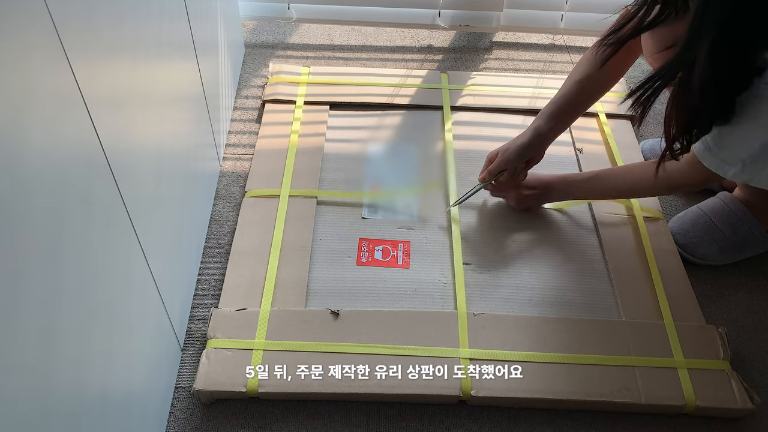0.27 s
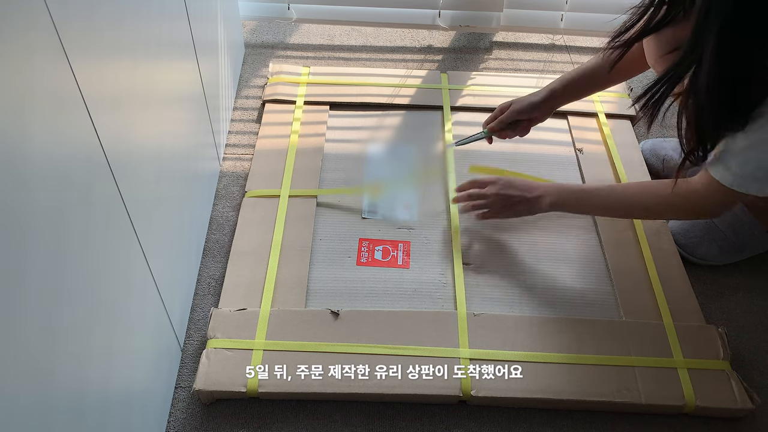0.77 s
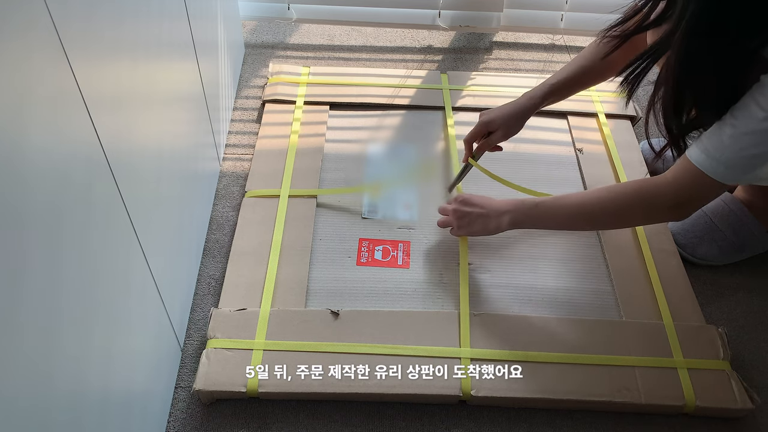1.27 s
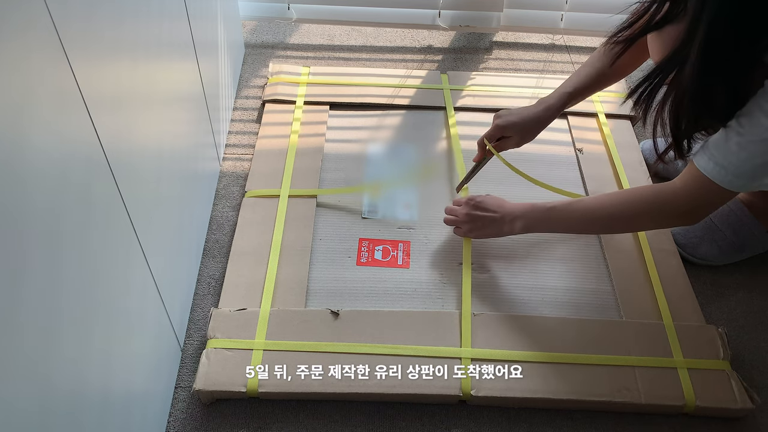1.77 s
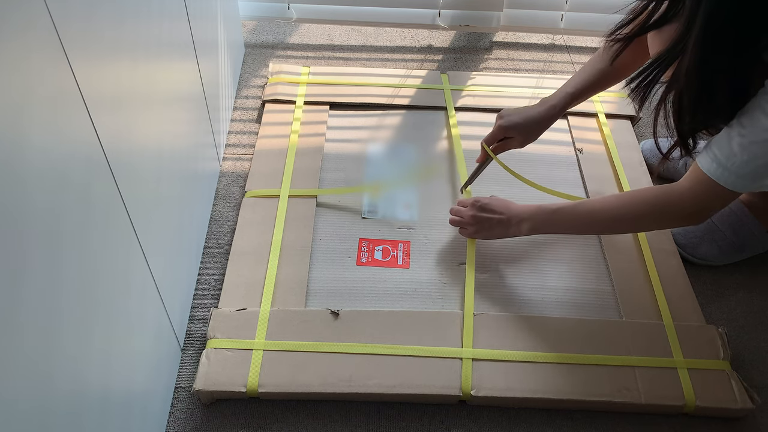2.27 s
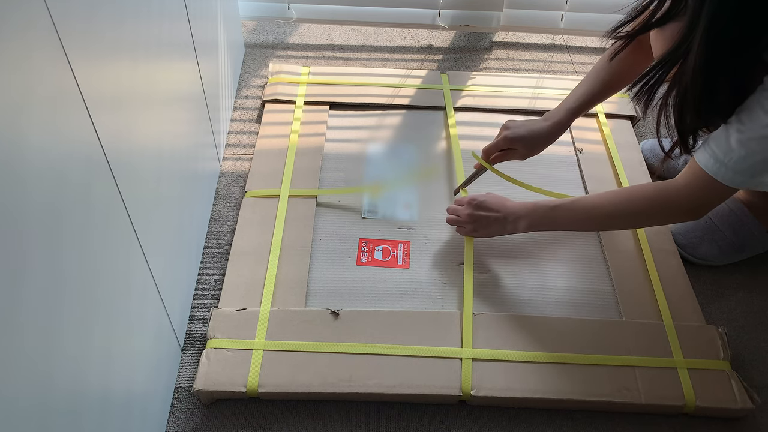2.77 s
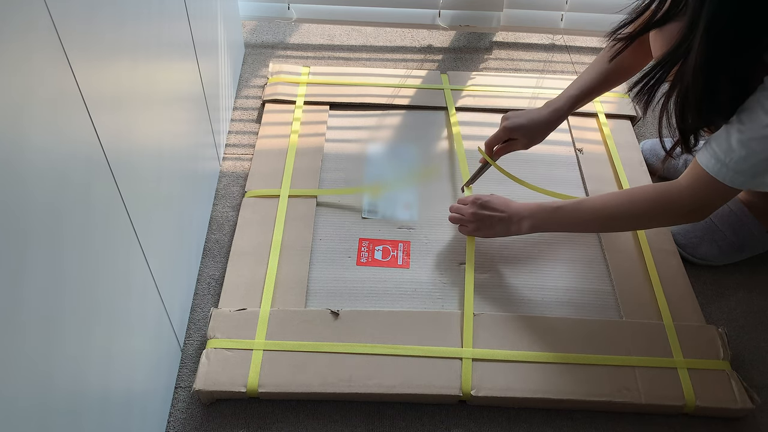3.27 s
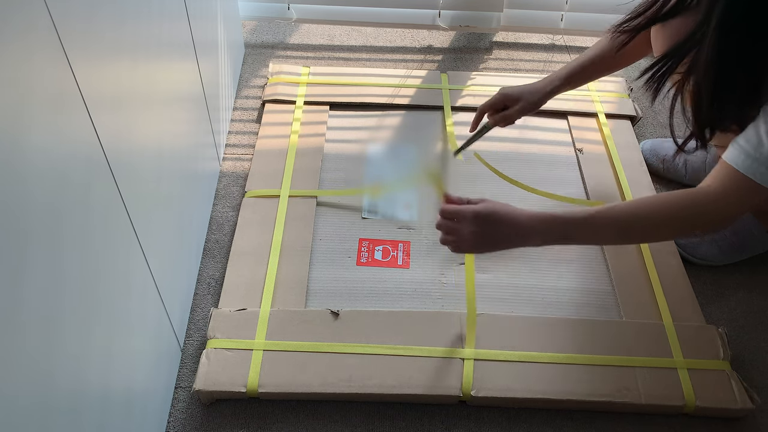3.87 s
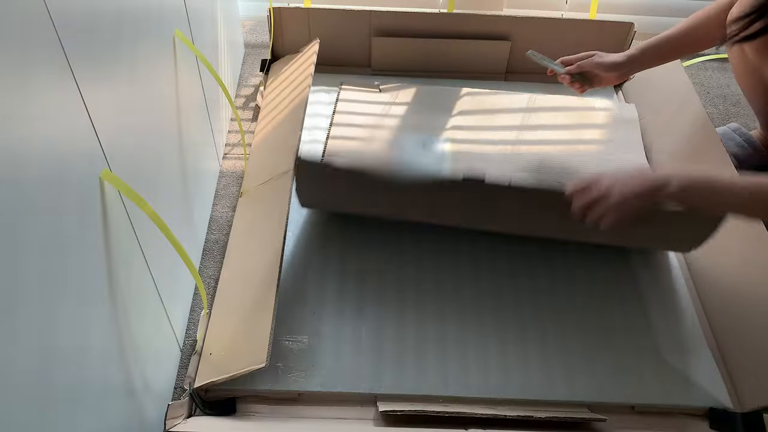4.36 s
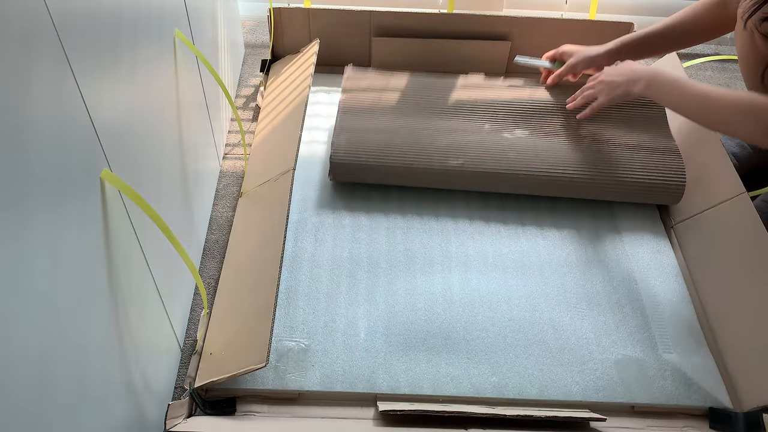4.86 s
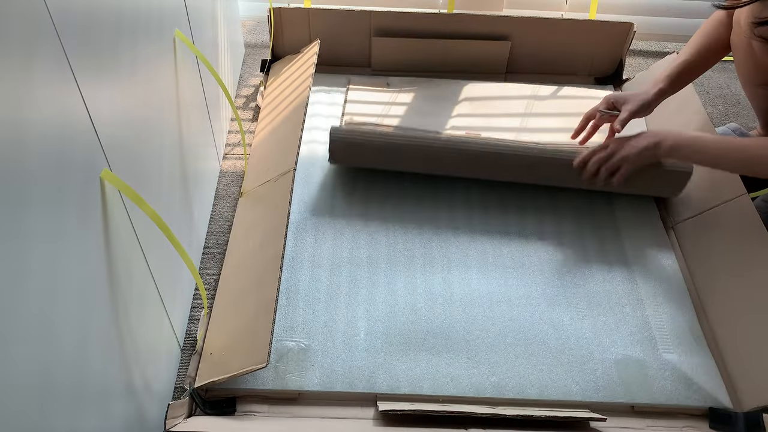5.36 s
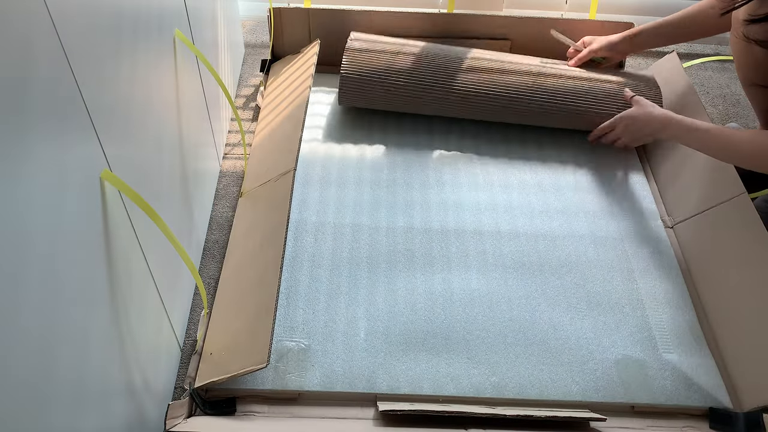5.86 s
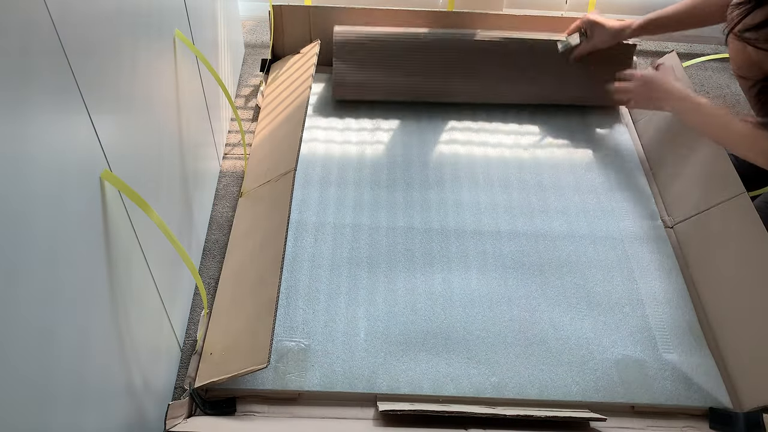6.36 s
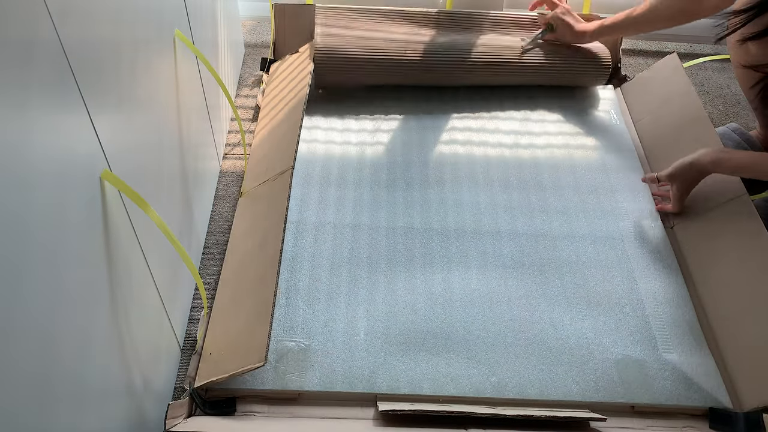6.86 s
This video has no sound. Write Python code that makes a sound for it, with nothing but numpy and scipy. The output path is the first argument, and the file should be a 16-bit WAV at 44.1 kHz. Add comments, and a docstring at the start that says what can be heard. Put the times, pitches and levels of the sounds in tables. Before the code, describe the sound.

In a small bare room, plastic strapping is cut with dry ticks and sharp snaps, followed by cardboard rolling, rustling, hissing and knocking.

```python
"""Dry ticks, slips and loud snaps: a knife saws at taut plastic straps round a flat cardboard parcel on the floor.
Then a corrugated sheet is lifted, rolled up and dragged over foam, with crackle, hiss and knocks.
Ticks and knocks are noise bursts through resonances; rubbing and dragging are clumps of random clicks, filtered.
A small bare room adds one echo and a strong diffuse tail, over a very quiet floor; both channels are alike."""
import sys
import numpy as np
from scipy import signal
from scipy.fft import rfft, irfft
from scipy.io import wavfile

SR = 44100
rng = np.random.default_rng(int(sys.argv[2]) if len(sys.argv) > 2 else 0)


def output_pcm(signal):
    """Save a mono or channel-first signal as 16-bit PCM at the path in sys.argv[1].

    Samples are clipped to [-1, 1] before scaling.
    """
    pcm = np.clip(np.atleast_2d(signal).T, -1, 1) * 32767
    wavfile.write(sys.argv[1], SR, np.round(pcm).astype(np.int16))


N = 313992

# Ticks and snaps of knife and strap. Each row: start in seconds, crack peak in dB, blade ring in Hz,
# strap ring in dB and in Hz, board thud in dB, how loosely the ends chatter on in dB,
# top of the crack and blade ring, both in dB against the crack.
TICKS = [(0.0499, -48.5, 5050, -63, 1940, -54, -10, -11, -2),
         (0.0729, -39, 4070, -46, 1710, -42.5, -21, -27, -3.5),
         (0.1508, -52, 5770, -62, 1960, -57.5, -6, -28, -8),
         (0.2032, -13, 5470, -15.5, 1370, -19, -19, -48, -9),
         (0.4375, -52, 5190, -56, 1250, -61, -16.5, -24, -5),
         (0.544, -48.5, 3200, -51, 1310, -65, -10, -17, -11),
         (0.5606, -43, 3040, -38.5, 1960, -62, -11, -9, -8),
         (0.5704, -38, 3060, -32, 1660, -60, -17, -4, -4),
         (0.585, -35, 2880, -50, 1580, -66, -8.5, -10, -3),
         (0.5946, -39, 5000, -25.5, 1630, -64, -16, -5, -11),
         (0.6136, -29, 3130, -33, 1680, -52, -17.5, -8, -15),
         (0.625, -31, 4800, -14, 1410, -29.5, -27.5, -18, -8),
         (0.6408, -36, 5070, -32, 1230, -34, -15, -20, -5),
         (0.7004, -39.5, 3870, -48, 1280, -56, -17.5, -20, -11),
         (0.876, -37, 3860, -27, 1680, -39.5, -15.5, -7.5, -2),
         (0.8904, -32.5, 3700, -26, 1840, -45.5, -10.5, -24, -13),
         (1.1881, -71.5, 3350, -64.5, 1600, -55.5, -18.5, -18, -11),
         (1.255, -40, 4330, -46, 1640, -46.5, -20, -18, 0.5),
         (1.3902, -62, 3440, -80, 1100, -55, -26.5, -18, -7),
         (1.4643, -43, 5500, -71, 2150, -54, -18.5, -30, -6.5),
         (1.6091, -41, 3030, -57, 1090, -37.5, -28.5, -1, -13),
         (1.6214, -34.5, 4500, -36.5, 1130, -38, -22.5, -22, -10.5),
         (1.6588, -39.5, 3350, -56, 1240, -49, -19, -24, 0),
         (1.6886, -60, 3360, -70, 1240, -38, -18, -5, -8),
         (1.7279, -38, 5400, -62, 1140, -53, -24, -25, 1.5),
         (1.7973, -47.5, 5400, -51.5, 1260, -50, -15, -14, -14),
         (1.8506, -54, 5300, -64, 1070, -42, -20, -18, -6),
         (1.9327, -51, 5260, -48, 1230, -41.5, -21, -19, -8),
         (1.9488, -35.5, 3500, -61, 1220, -61, -26, -26, -12),
         (2.0409, -45.5, 5510, -58, 1070, -44.5, -16, -29, -10),
         (2.0782, -44, 3560, -69, 1330, -35, -30, -27, -1.5),
         (2.168, -33, 4930, -55, 1090, -30.5, -27, -6, -7),
         (2.198, -30, 5740, -36, 2180, -35, -11, -23, -7),
         (2.212, -18, 5790, -28, 1580, -27.5, -26, -33, -20),
         (2.2654, -23.5, 5500, -30.5, 1940, -36.5, -15, -34, -1.5),
         (2.2844, -29.5, 5360, -30, 1250, -48, -19, -4.5, -14),
         (2.3047, -21.5, 3470, -28, 1740, -26.5, -22.5, -26, -11),
         (2.371, -35.5, 3100, -43, 1320, -68, -38, -16, -8),
         (2.3999, -44, 5250, -64, 1180, -70, -23, -17, -3),
         (2.5092, -55, 3640, -69, 1120, -48.5, -18.5, 3.5, -8),
         (2.5271, -40.5, 5070, -56, 1630, -45.5, -28, -46, -13),
         (2.614, -33.5, 5100, -49, 1110, -30.5, -30, -12, -6.5),
         (2.72, -63, 5270, -76, 1310, -45.5, -18, -17, -2),
         (2.7626, -24.5, 5500, -35.5, 1220, -33, -21, -19, -20),
         (2.8675, -42, 5240, -70, 1750, -80, -29, -17, -11),
         (2.9534, -46, 3630, -63, 1700, -49.5, -20, -31, -8),
         (2.9688, -28.5, 3370, -33.5, 1400, -45.5, -21, -24, -1),
         (2.9981, -39.5, 3320, -55, 1420, -40.5, -16.5, -11, -6),
         (3.095, -41.5, 5300, -64, 1590, -56, -31, -16, -13),
         (3.1568, -42, 3720, -68, 2090, -67, -26.5, 0, -0.5),
         (3.1786, -35.5, 4940, -41, 1260, -37, -22.5, -27, -18),
         (3.271, -66, 5360, -69, 1270, -34.5, -25, -20, -8),
         (3.3285, -37, 5320, -41, 1570, -32, -31, -29, -10),
         (3.3884, -38.5, 3640, -59, 2130, -49, -12, -15, -3.5),
         (3.4135, -25.5, 5440, -29, 1120, -34.5, -15.5, -7, -14),
         (3.428, -24, 5630, -41, 1090, -40.5, -25, -19, -22),
         (3.4447, -24.5, 5750, -32.5, 1710, -41, -25, -25, -15),
         (3.5142, -13, 3070, -10, 1426, -14, -26, -42, -8.5),
         (3.6222, -36.5, 4850, -30, 1340, -50, -23.5, -18, -14),
         (3.728, -42, 3040, -69, 1450, -59, -18.5, -15, -5),
         (3.8045, -47.5, 6000, -47, 1920, -59, -16, -25, -11),
         (3.8811, -58.5, 3130, -62, 1375, -74, -28, -11, -1),
         (3.919, -32.5, 4300, -75.5, 2000, -81, -24, -30, -4)]


def amp(db):
    """Gain of a level in dB."""
    return 10 ** (np.asarray(db) / 20)


def rms_one(x):
    """Scaled to rms 1."""
    return x / np.sqrt(np.mean(x ** 2) + 1e-20)


def peak_one(x):
    """Scaled to peak 1."""
    return x / np.max(np.abs(x))


def in_time(rows):
    """The columns of a curve at every sample; -200 dB outside it."""
    s, *columns = np.transpose(rows)
    t = np.arange(N) / SR
    return [np.interp(t, s, column, left=-200, right=-200) for column in columns]


def at_hz(points, hz):
    """A table of (Hz, value) read on a log-frequency axis."""
    table_hz, values = np.array(points).T
    return np.interp(np.log(hz), np.log(table_hz), values)


def coloured(x, spectrum):
    """x shaped by a spectrum in dB."""
    hz = np.maximum(np.fft.rfftfreq(len(x), 1 / SR), 1)
    return irfft(rfft(x) * amp(at_hz(spectrum, hz)), len(x))


def band(x, low_hz, high_hz):
    """Band-pass."""
    return signal.sosfilt(signal.butter(2, [low_hz, high_hz], "band", fs=SR, output="sos"), x)


def resonance(x, hz, width_hz):
    """Two-pole resonance, gain 1 on top."""
    r = np.exp(-np.pi * width_hz / SR)
    feedback = [1, -2 * r * np.cos(2 * np.pi * hz / SR), r * r]
    return signal.lfilter([(1 - r * r) / 2, 0, (r * r - 1) / 2], feedback, x)


def drift(rate_hz):
    """Slow random wander of rms 1: noise through two equal low-pass poles."""
    r = np.exp(-2 * np.pi * rate_hz / SR)
    noise = rng.standard_normal(N + SR)
    return rms_one(signal.lfilter([1], [1, -2 * r, r * r], noise)[SR:])


def grains(per_s, spread_db, clump_db):
    """Random clicks of uneven size that come in clumps."""
    sizes = amp(spread_db * np.minimum(rng.exponential(1, N), 3)) * rng.standard_normal(N)
    present = rng.random(N) < per_s / SR
    clumps = amp(clump_db * np.clip(drift(25), -2, 2))
    return sizes * present * clumps


def after(times, levels_db, rise_s, fade_db_per_s):
    """Gain that swells after each event and fades; powers add."""
    power, t = np.zeros(N + SR), np.arange(SR) / SR
    shape = (np.clip(t / rise_s, 0, 1) * amp(-fade_db_per_s * t)) ** 2
    for s, db in zip(times, levels_db):
        power[round(s * SR):][:SR] += amp(db) ** 2 * shape
    return np.sqrt(power[:N])


def quiet_floor():
    """Faint steady noise under everything, shaped by its spectrum."""
    # Each row: frequency in Hz, spectral density in relative dB per Hz.
    floor_spectrum = [(25, -66.5), (45, 14), (65, 13.5), (110, 11.5), (450, 3), (1300, 3), (2400, -3.5),
                      (5400, -5), (12000, -19.5), (16000, -28)]
    return amp(-75) * rms_one(coloured(rng.standard_normal(N), floor_spectrum))


def room(x):
    """Direct sound, one near-wall echo and a diffuse tail, drawn anew every 4096 samples, dying band by band."""
    # Each row: frequency in Hz, time to die by 60 dB in seconds.
    decay_times = [(80, 0.44), (250, 0.27), (600, 0.36), (1500, 0.19), (4000, 0.21), (10000, 0.31)]
    wall_echo_s, wall_echo_db, tail_db = 0.012, -14, -7
    step = 4096      # samples between one tail and the next
    t, out = np.arange(SR // 2) / SR, x.copy()
    edges = 40 * 2 ** np.arange(0, 9.1, 1)      # octave bands, Hz
    white = rng.standard_normal((2, N // step + 2, len(t)))      # neighbouring bands get unrelated noise
    tails = 0
    for k, (low, high) in enumerate(zip(edges, edges[1:])):
        t60 = at_hz(decay_times, np.sqrt(low * high))
        tails = tails + band(white[k % 2], low, high) * amp(-60 * t / t60)
    tails = tails * np.clip(t / .014, 0, 1) ** 1.2      # reflections thicken over the first milliseconds
    tails = amp(tail_db) * tails / np.sqrt(np.mean(np.sum(tails ** 2, axis=1)))
    tails[:, round(wall_echo_s * SR)] += amp(wall_echo_db)
    for k, tail in enumerate(tails[:-1]):
        start = k * step
        wet = signal.fftconvolve(x[start:start + step], tail)[:N - start]
        out[start:start + len(wet)] += wet
    return out


def board(x):
    """The broad modes of the cardboard panel, in parallel."""
    # Each row: mode in Hz, width in Hz, level in dB.
    modes = [(175, 42, -5), (270, 69, -6.5), (335, 91, 18), (446, 610, 32), (670, 280, 20.5),
             (990, 790, -2.5)]
    return sum(amp(db) * resonance(x, hz, width_hz) for hz, width_hz, db in modes)


def drag():
    """Flutes crackle as the sheet bends; its face slides on the foam with a finer hiss."""
    # Sheet lifted, then rolled and dragged, one group of rows a stroke. Each row: time in seconds,
    # flute crackle in dB, foam hiss and board in dB against the crackle.
    strokes = [
        [(4.03, -76, 2, -6), (4.092, -52, -12.5, 1), (4.31, -52, -6, -8.5), (4.394, -57, 1, -11),
         (4.49, -51.5, 2.5, -4)],
        [(4.503, -27.5, -11.5, -4), (4.533, -44, -17.5, 5.5), (4.615, -58.5, -18, 2), (4.66, -64, -4, -5)],
        [(4.67, -50, -13, -5), (4.818, -45, -9.5, -6.5), (4.948, -76, -8, 1), (4.98, -45.5, -3, -4.5),
         (5.07, -66.5, -7, 5)],
        [(5.08, -59.5, 3, -1), (5.124, -39, -5, -4.5), (5.23, -47.5, -10, -3.5), (5.324, -52, -1, -10),
         (5.35, -47.5, -1, -10)],
        [(5.36, -47, -4.5, -7), (5.418, -38.5, -5, -2.5), (5.544, -38, -4, -7), (5.624, -44.5, -7, -3),
         (5.83, -48.5, -4, -6)],
        [(5.84, -47.5, -16, -2), (5.886, -51.5, 2.5, -4), (5.904, -43, -12, 2.5), (5.988, -36, -6.5, 2),
         (6.11, -53.5, -7.5, -12)],
        [(6.12, -54, -16, 0), (6.124, -51, -6.5, 2), (6.176, -43.5, 0, 2.5), (6.196, -34.5, -4.5, -1.5),
         (6.255, -40.5, -3, 2)],
        [(6.266, -29, -20, -9), (6.292, -34.5, -6, 0), (6.432, -42, -9, -1.5), (6.59, -37, -9.5, -3.5),
         (6.6, -46, -5, -1)],
        [(6.612, -43, 5, -2), (6.624, -29.5, -7, 2.5), (6.704, -30, -1, -17.5), (6.74, -35.5, -4, -4.5),
         (6.84, -42, -5.5, -4)],
        [(6.85, -39.5, -5, -1), (6.908, -33, -12.5, -8), (6.958, -49, -16, 3), (7.066, -57, -15, 6),
         (7.075, -58, -34, -9)],
    ]
    # Each row: frequency in Hz, colour of the sheet in relative dB per Hz.
    sheet_spectrum = [(24, -49), (40, 13.5), (127, -0.5), (159, -2), (290, 2), (503, 4.5), (1630, -5),
                      (3140, -10.5), (5310, -13), (6170, -18.5), (11800, -19.5), (16000, -25)]
    crackle_db, hiss_db, board_db = in_time(np.vstack(strokes))
    creases = coloured(grains(3500, spread_db=-2.0, clump_db=2.0), sheet_spectrum)
    slide = coloured(grains(8000, spread_db=1.5, clump_db=2.5), sheet_spectrum)
    flexing = rms_one(band(band(creases, 45, 2200), 45, 2200))
    panel = rms_one(band(board(creases), 65, 1100))
    low = rms_one(flexing + amp(3.5) * panel)
    crackle = rms_one(band(creases, 639, 3250))
    hiss = rms_one(band(slide, 4000, 17000))
    return amp(crackle_db) * (amp(board_db) * low + crackle + amp(hiss_db) * hiss)


def rub():
    """Small slips that stir the board and the strap, and hiss; the looser a tick, the more follows it."""
    # Rows for board, strap, hiss and top of the hiss. Each row: rise in seconds, fade in dB per second,
    # level in dB against the tick and its looseness.
    swells = [(0.005, 190, 9), (0.0048, 216, -1), (0.0037, 238.5, 1), (0.01, 253, 13.5)]
    # Each row: frequency in Hz, colour of the hiss in relative dB per Hz.
    hiss_spectrum = [(1180, -111), (2000, -61), (2830, 19.5), (3680, 16.5), (5580, 14), (12800, -16.5),
                     (16000, -3.5)]
    s, crack_db, _, strap_db, _, thud_db, loose_db, top_db, _ = np.transpose(TICKS)
    ticks_db = thud_db, strap_db, crack_db, crack_db + top_db
    slips = grains(3000, spread_db=3.0, clump_db=3.0)
    layers = (board(slips), band(slips, 730, 2100), coloured(slips, hiss_spectrum), band(slips, 8000, 19000))
    out = np.zeros(N)
    for layer, tick_db, (rise_s, fade_db_per_s, db) in zip(layers, ticks_db, swells):
        out += after(s, tick_db + loose_db + db, rise_s, fade_db_per_s) * rms_one(layer)
    return out


def hits(table, shared, crack_s, bright_width_hz):
    """Each hit: a crack, a bright and a middle ring, a thud and boom of the board, then a rattle."""
    # Lowest and highest pitch in Hz that a struck spot may favour.
    spot_range = (350, 1000)
    out, t = np.zeros(N + 4096), np.arange(4096) / SR
    noise = rng.standard_normal((len(table), 3, 4096))
    spots = np.exp(rng.uniform(*np.log(spot_range), len(table)))
    soft_boom_db, flex_db, growth = shared
    skip = round(.0025 * SR)
    for row, (quick, slow, loose), spot_hz in zip(table, noise, spots):
        s, crack_db, bright_hz, middle_db, middle_hz, thud_db, rattle_db, top_db, bright_db = row
        # loose ends chatter on
        rattle = amp(rattle_db) * loose ** 3 * np.exp(-t / 0.033) * np.tanh(t / 0.0022) / 3
        burst = quick * (t / crack_s) * np.exp(1 - t / crack_s) + rattle
        burst[skip:] += amp(-11.5) * burst[:-skip]      # the contact skips once

        body, top = band(burst, 2000, 8000), band(burst, 8000, 19000)
        crack = peak_one(body) + amp(top_db) * peak_one(top)
        bright = peak_one(resonance(burst, bright_hz, bright_width_hz))
        # two or three cycles
        middle = peak_one(resonance(resonance(burst, middle_hz, 530), middle_hz, 530))

        # soft contact: starts later, lasts longer
        thud = board(slow * (t / 0.0081) * np.exp(-t / 0.0026) * 2 + rattle)
        # the struck spot favours one pitch
        thud = band(thud + amp(3) * resonance(thud, spot_hz, 220), 100, 1354)

        push = slow * t * np.exp(-t / 0.0078)
        upper_boom = band(band(push, 150, 320), 150, 320)
        lower_boom = band(band(push, 69, 105), 69, 105)
        boom = peak_one(upper_boom + amp(-3.0) * lower_boom)
        boom_db = soft_boom_db + growth * max(thud_db - flex_db, 0)      # hard blows flex the whole board

        hit = amp(crack_db) * (crack + amp(bright_db) * bright)
        hit += amp(middle_db) * middle
        hit += amp(thud_db) * (peak_one(thud) + amp(boom_db) * boom)
        i = round(s * SR)
        out[i:i + 4096] += hit
    return out[:N]


def sheet_knocks():
    """Creases and knocks of the sheet: a very short crack and a broad bright ring."""
    # Each row: start in seconds, crack peak in dB, bright ring in Hz, middle ring in dB and in Hz,
    # board thud in dB, how loosely the sheet chatters on in dB,
    # top of the crack and bright ring, both in dB against the crack.
    knocks = [(4.0842, -46.5, 4110, -47, 1140, -51, -11, -28, -9),
              (4.1325, -34.5, 5060, -49, 1690, -58, -17.5, -19, -9),
              (4.1507, -35, 6490, -49, 1710, -36.5, -24, -17, -11),
              (4.2364, -47, 6350, -56, 1280, -53, -29, -12, 8),
              (4.2716, -29.5, 4240, -35.5, 1010, -38.5, -14, -32, -30),
              (4.3827, -33.5, 4370, -65, 2170, -78, -15, -7, -12),
              (4.5009, -39.5, 3670, -24, 1150, -23, -24, -3, 13),
              (4.6966, -48, 3040, -56, 1140, -55, -13, -26, -7),
              (4.9746, -45, 3230, -62, 1330, -65, -18, -12, 8.5),
              (5.0272, -62, 3480, -59, 1060, -39.5, -27, -12, -9),
              (5.0895, -39, 4180, -46, 1540, -50, -11, -11, -13),
              (5.2088, -41, 3330, -39, 1350, -37, -8, -7, -1),
              (5.4282, -35, 4080, -35, 1050, -28.5, -9, -11, -9),
              (5.5469, -23.5, 3330, -29.5, 2050, -29, -21, -1, -18),
              (5.7871, -36.5, 4480, -39, 1300, -35, -17.5, -15, -12),
              (5.8743, -28.5, 6220, -46, 1450, -58, -19, -11, -8),
              (5.9261, -25, 3800, -46, 1570, -34, -25, -20, -15),
              (5.9908, -31, 5170, -40, 1290, -31.5, -14, -11, -2),
              (6.1285, -37, 3080, -55, 1060, -38, -19, -19, -19),
              (6.1804, -23, 4100, -45, 1340, -27.5, -23, -16, -13),
              (6.1917, -30, 3880, -39, 1070, -22.5, -27, -16, -9),
              (6.2632, -26.5, 3020, -22.5, 1170, -23.5, -13, -20, -2.5),
              (6.5022, -26.5, 5200, -34, 1080, -33, -21, -16, -9),
              (6.5345, -36, 4700, -25, 1260, -27, -37, -12, -9),
              (6.558, -20, 4470, -43.5, 1600, -37, -39, -23, -6.5),
              (6.575, -23, 3760, -43, 1410, -42, -26, -18, -10),
              (6.5904, -43, 4640, -50, 1200, -60, -21, -11, -9),
              (6.6054, -37, 4240, -50, 2170, -54, -24, -17, -9),
              (6.6196, -22, 4240, -26.5, 1460, -38, -14, -10, -7),
              (6.7284, -40, 4160, -27, 1490, -28, -6, -13, -11),
              (6.859, -20, 4620, -35, 1180, -32, -14, -23, -17),
              (6.91, -19.5, 4200, -34, 1050, -29.5, -25, -10, -9),
              (7.0917, -69, 3040, -59, 1130, -30.5, -16.5, -8, -9)]
    # Boom of a soft blow in dB against the thud, thud in dB from which the whole board flexes,
    # growth of the boom in dB per dB beyond it.
    boom_law = (-12.5, -24, 0.11)
    return hits(knocks, boom_law, crack_s=0.00041, bright_width_hz=420)


def strap_snaps():
    """Knife ticks and strap snaps: a longer crack, and a narrower ring of the blade."""
    # Boom of a soft blow in dB against the thud, thud in dB from which the whole board flexes,
    # growth of the boom in dB per dB beyond it.
    boom_law = (-25, -30.5, 0.98)
    return hits(TICKS, boom_law, crack_s=0.0010, bright_width_hz=130)


def scene():
    """All sources in the room over a faint steady floor, alike in both channels."""
    floor = quiet_floor()
    parcel = drag() + rub() + sheet_knocks() + strap_snaps()
    deep = signal.sosfilt(signal.butter(2, 140, fs=SR, output="sos"), parcel)
    above = signal.sosfilt(signal.butter(2, 140, "high", fs=SR, output="sos"), parcel)
    radiated = above - amp(-12) * deep      # the deep bass below 140 Hz is held well down
    return np.tile(room(radiated) + floor, (2, 1))


def record(dry):
    """The microphone drops the deep bass; the top is cut steeply."""
    dry = signal.sosfilt(signal.butter(2, 45.0, "high", fs=SR, output="sos"), dry)
    return signal.sosfilt(signal.cheby2(14, 60, 16600, fs=SR, output="sos"), dry)


dry = scene()
out = record(dry)
output_pcm(out)
```